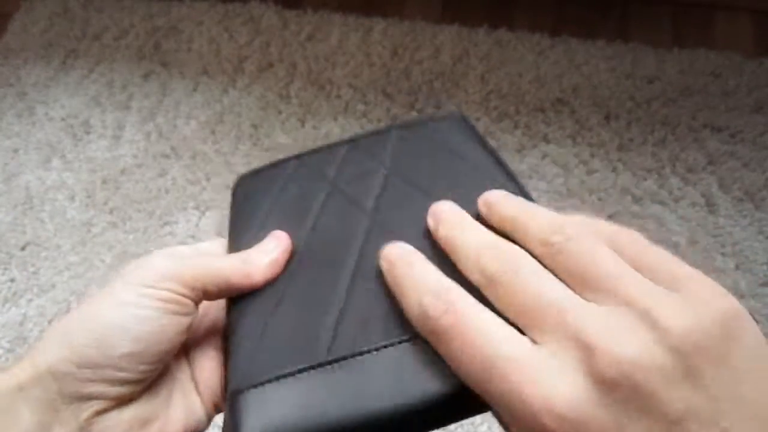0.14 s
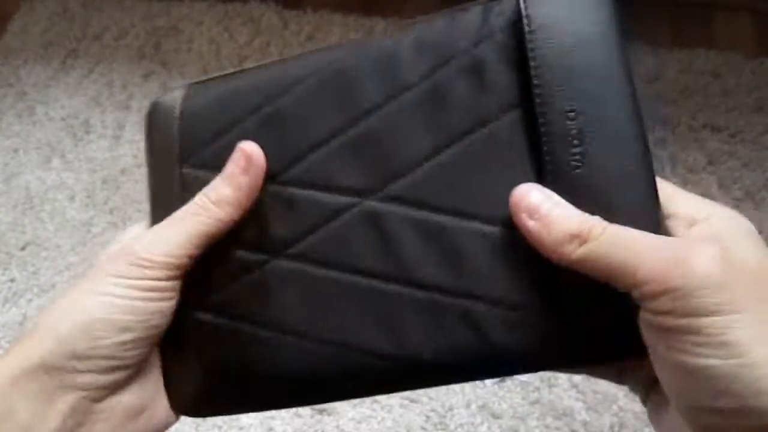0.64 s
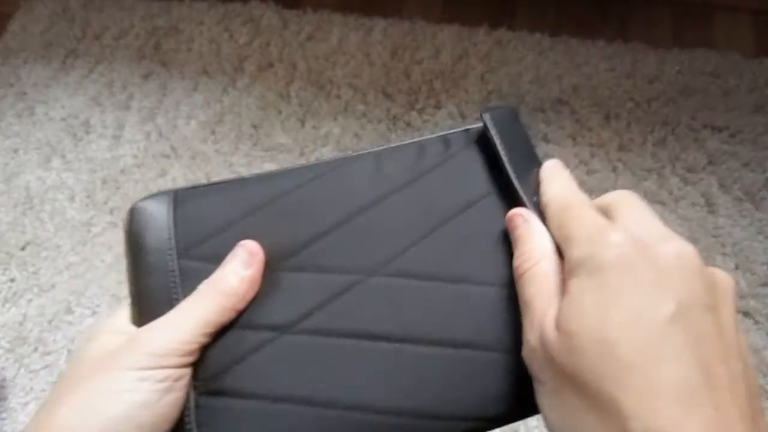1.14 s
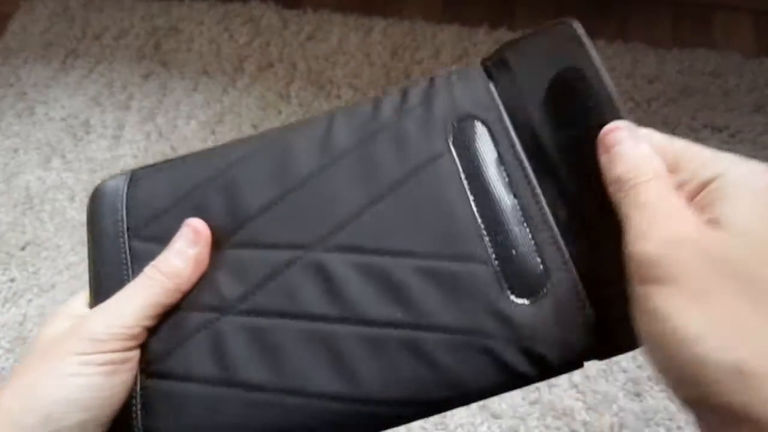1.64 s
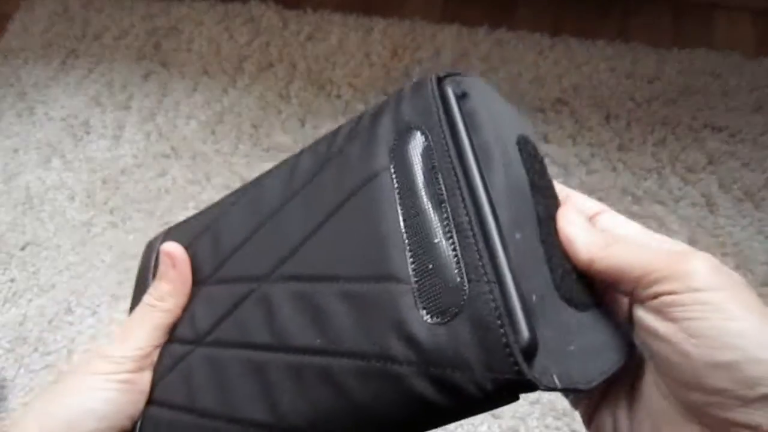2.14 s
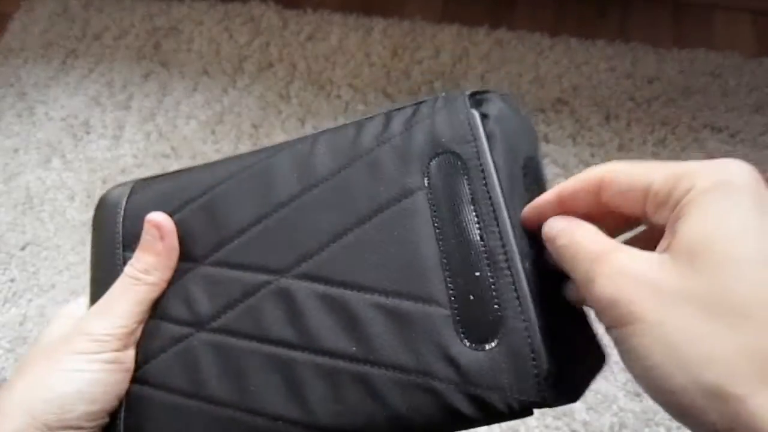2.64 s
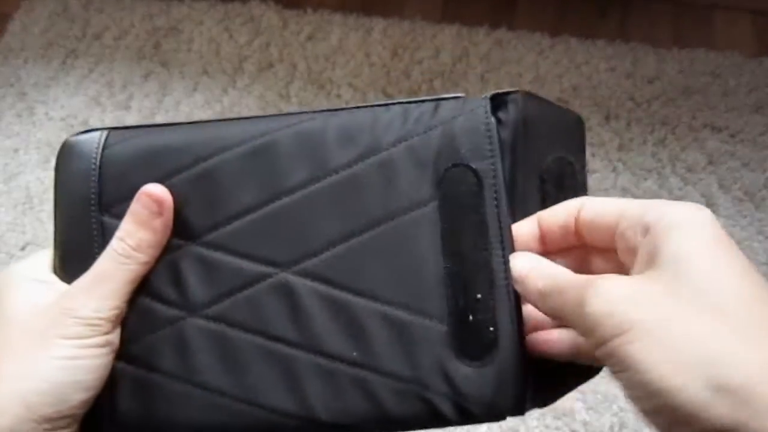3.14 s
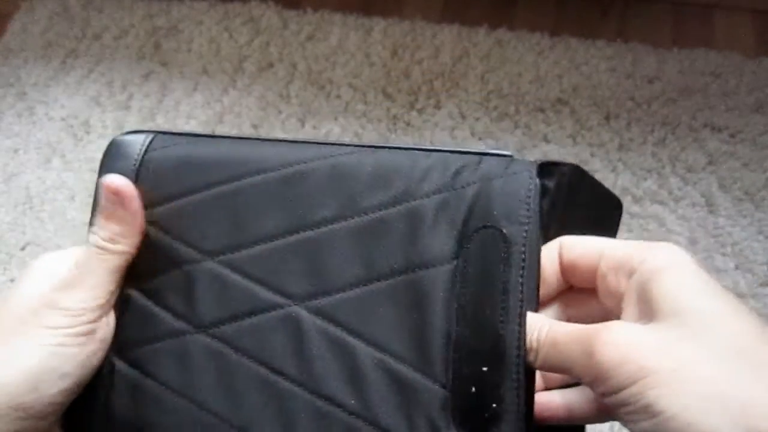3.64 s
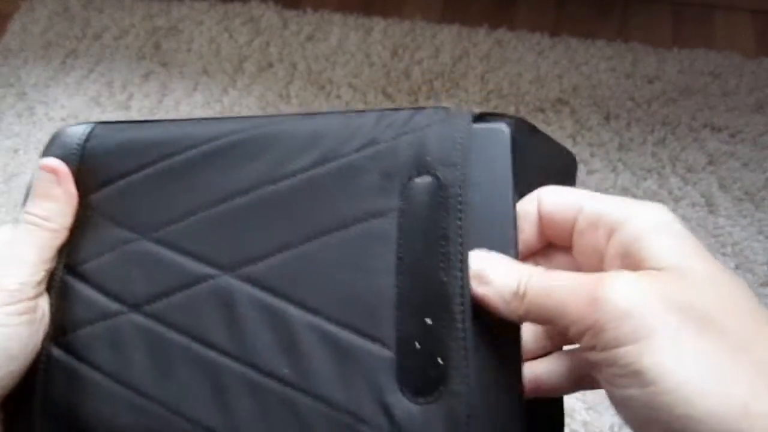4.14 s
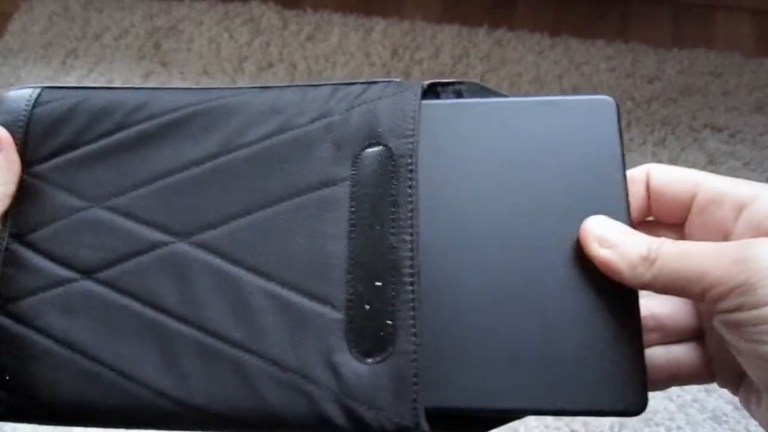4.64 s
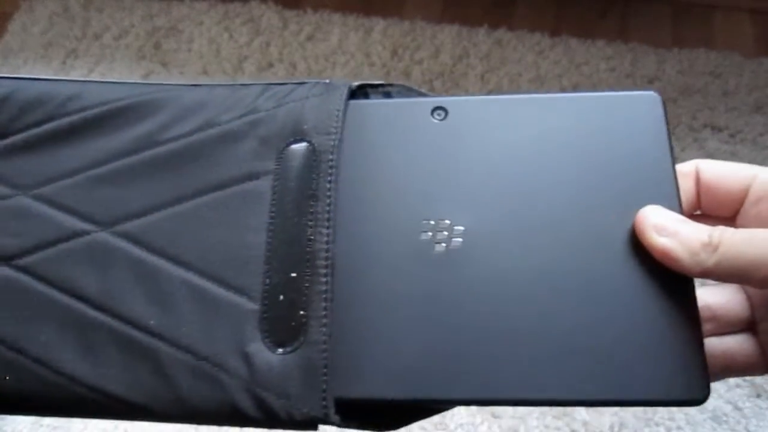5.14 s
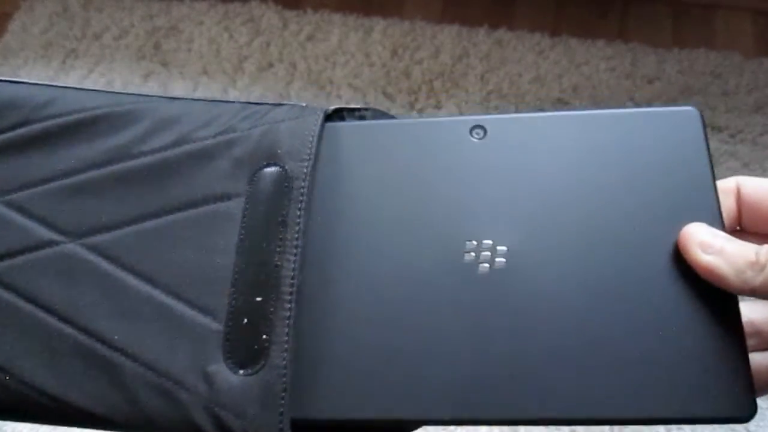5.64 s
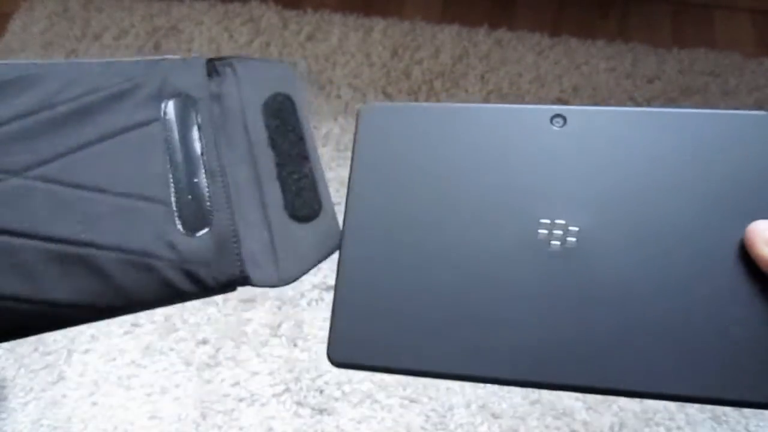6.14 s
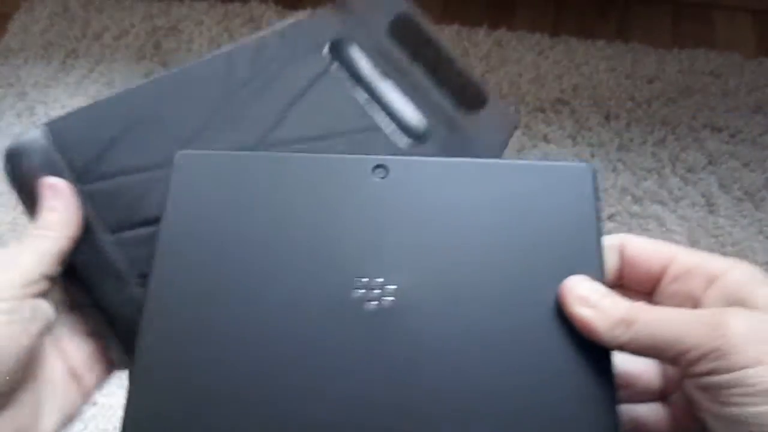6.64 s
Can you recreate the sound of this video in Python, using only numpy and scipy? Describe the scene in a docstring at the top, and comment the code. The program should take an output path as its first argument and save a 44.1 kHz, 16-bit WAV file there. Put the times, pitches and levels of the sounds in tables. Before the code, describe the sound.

A close mono microphone picks up a quiet carpeted room with a low, soft, bass-heavy tone. From 0 s fingers brush padded fabric, with a light tap near 0.06 s and a fuller cloth stroke around 0.25 s. Between 0.74 and 0.87 s a few hook-and-loop hooks pop sharply. From 1.0 s they snap one after another, thickening into a bright tearing crackle, densest around 1.25-1.48 s, then stopping abruptly with a short room tail. From 1.7 to 2.8 s only faint rubs and tiny ticks remain. Around 3-3.4 s soft rustles and small clicks return, with a crisper click near 3.9 s. From 4.1 to 5.6 s a tablet slides out with light, airy hissing strokes. A dull low knock lands at 5.78 s, another tap at 6.39 s, then little ticks and soft handling until 6.8 s.

```python
"""Fingers brush and tick on a padded fabric sleeve as hands turn it over a carpet, over a low room tone.
The hook-and-loop flap rips open: hooks let go one by one, then in a dense tearing crackle; a tablet slides out.
Ticks and single hooks ring the decaying modes of the sleeve, the tear rings clumps of random snaps, and
rubbing is grainy noise in a dull and a bright band. The floor adds a quick echo, the room a short tail."""
import sys
import numpy as np
from scipy import signal
from scipy.fft import rfft, irfft
from scipy.io import wavfile

SR = 44100
rng = np.random.default_rng(int(sys.argv[2]) if len(sys.argv) > 2 else 0)


def magnitude_from_level(level_db):
    """Linear magnitude for a level in decibels (20 dB per decade)."""
    exponent = np.asarray(level_db, float) / 20
    return 10 ** exponent


def output_pcm(signal):
    """Save a mono or channel-first signal as 16-bit PCM at the path in sys.argv[1].

    Samples are clipped to [-1, 1] before scaling.
    """
    pcm = np.clip(np.atleast_2d(signal).T, -1, 1) * 32767
    wavfile.write(sys.argv[1], SR, np.round(pcm).astype(np.int16))


N = 298557  # samples in the scene

# room tone, sinking under the rip and climbing back: start_s, level_db
ROOM_TONE_LEVEL = [(0, -54), (.75, -57), (1.0, -57), (1.5, -62), (1.8, -63.5), (2.4, -59), (3.2, -56),
                   (4.8, -54), (6.2, -56.5), (6.77, -55.5)]
# spectrum of the room tone, heavy in the bass: frequency_hz, density_db (power per Hz)
ROOM_TONE_COLOUR = [(20, 4), (50, 4), (150, 4), (440, -2.5), (1000, -8.5), (4000, -18), (16000, -25.5)]
# hands shifting their grip on the cloth, nearly still while the flap tears: start_s, level_db
GRIP_LEVEL = [(0, -59), (.44, -65), (.52, -59), (.57, -66), (.7, -55), (1.0, -60), (1.02, -78), (1.66, -80),
              (1.72, -68), (2.14, -72), (2.45, -74), (2.66, -63), (2.9, -70), (3.45, -59), (3.76, -63),
              (4.04, -56), (4.49, -59), (4.53, -68), (4.62, -66), (4.9, -59), (5.3, -64), (5.8, -64),
              (5.9, -69), (6.33, -73), (6.45, -59), (6.77, -61)]
# strokes of fingers and tablet over the weave:
# start_s, hold_s, level_db, brightness_db (bright part against dull), fade_s (time to fall 20 dB)
WEAVE_STROKES = [(.01, .07, -51, -1.2, .22), (.24, .02, -43.5, 0.1, .085), (.595, .03, -55, 5.5, .13),
                 (.71, .06, -51, -6, .17), (.87, .12, -64, 5, .05), (1.698, .01, -66, 1.2, .4),
                 (1.865, .02, -60, 3.5, .15), (2.04, .04, -64, -8, .08), (2.265, .07, -63, -4, .21),
                 (2.53, .02, -63, 2.2, .06), (2.56, .01, -56, -1.2, .06), (2.76, .02, -61, -3, .12),
                 (2.935, .06, -57, -5, .11), (2.975, .05, -53, -3, .21), (3.12, .02, -54, -9, .21),
                 (3.283, .1, -51.5, -5, .08), (3.54, .13, -58, 0.1, .1), (4.075, .05, -62, 4, .11),
                 (4.12, .27, -56, 6.8, .2), (4.43, .075, -59, 5, .04), (4.64, .2, -58, 4, .08),
                 (4.92, .31, -61, 6, .4), (5.33, .14, -63, 5, .15), (5.49, .11, -61, 4.5, .15),
                 (5.555, .004, -54, -9, .08), (5.69, .07, -63, 5, .05), (5.781, .004, -52, -4, .05),
                 (6.395, .004, -60, 2.2, .15), (6.74, .05, -57, 2.2, .11)]
# modes of the sleeve, from the padding up to the fizz of the fibres: pitch_hz, t60_s
SLEEVE_MODES = [(165, .04), (310, .022), (640, .012), (1130, .0065), (1800, .0045), (3000, .002),
                (4700, .0013), (7000, .0008), (10500, .0005)]
# fingers, seams and the tablet edge ticking:
# start_s, level_db, hardness_steps (0 pad, 1 flap, 2 crack, 3 fizz), narrowness_db_per_step
CONTACT_TICKS = [(0.0624, -23, 0.9, 5.0), (0.676, -33, 0.8, 4.0), (0.6845, -33, 1.6, 5.0),
                 (1.478, -21, 0.7, 6.0), (1.485, -33, -0.5, 4.0), (1.691, -38, 2.3, 12.0),
                 (1.8905, -41, 1.6, 5.0), (1.7068, -44, 0.2, 6.0), (2.014, -40, 0.1, 6.0),
                 (2.077, -40, 0.2, 6.0), (2.0988, -42, 1.4, 6.0), (2.2285, -42, 1.7, 6.0),
                 (2.2304, -35, 1.8, 5.0), (2.2615, -33, 1.0, 3.0), (2.322, -35, 0.4, 2.0),
                 (2.3252, -40, 0.8, 2.0), (2.5644, -37, 1.7, 7.0), (3.008, -34, 0.75, 14.0),
                 (3.237, -31, 3.2, 14.0), (3.3168, -31, 1.9, 8.0), (3.3314, -29, 0.75, 12.0),
                 (3.336, -38, -0.3, 12.0), (3.375, -34, -0.2, 6.0), (3.5818, -41, 2.5, 4.0),
                 (3.6407, -36, 1.2, 5.0), (3.8673, -32, 2.2, 9.0), (3.8835, -25, 2.9, 7.0),
                 (3.9238, -33, 1.2, 5.0), (4.6359, -39, 2.0, 8.0), (4.848, -42, 0.1, 3.0),
                 (4.9, -38, -0.3, 9.0), (5.363, -36, 0.8, 4.0), (5.5495, -40, -0.1, 2.0),
                 (5.558, -31, 0.25, 5.0), (5.7703, -37, 1.9, 5.0), (5.7764, -19.5, 0.0, 16.0),
                 (5.786, -38, 1.3, 16.0), (6.3888, -22.5, 0.75, 7.0), (6.3988, -35, 1.7, 7.0),
                 (6.428, -41, 1.7, 4.0), (6.468, -40, 1.5, 4.0), (6.482, -36, 1.6, 3.0),
                 (6.505, -38, 1.6, 3.0), (6.5258, -37, 0.6, 3.0), (6.727, -39, -0.1, 9.0),
                 (6.755, -35, -0.1, 7.0)]
# the loudest hooks letting go: start_s, thud_level_db (flap), crack_level_db (fibres)
LOUD_HOOKS = [(0.742, -42, -24), (0.7567, -27.7, -24), (0.7611, -19, -7), (0.7668, -15, -4),
              (0.7956, -48, -22), (0.8636, -21, -10), (1.014, -15.5, -13.5), (1.036, -17.5, -19),
              (1.0578, -21, -10.5), (1.069, -18.5, -10), (1.0771, -24, -14), (1.0802, -22, -17),
              (1.0918, -25, -18.7), (1.102, -28, -13), (1.127, -30, -16.5), (1.1404, -42, -13),
              (1.1455, -41, -21), (1.149, -30, -13), (1.152, -41, -20), (1.1676, -24.5, -9),
              (1.1791, -34, -5.5), (1.1818, -33, -18), (1.1848, -27, -18), (1.2038, -23, -12),
              (1.2064, -25, -12), (1.2094, -21, -14), (1.2269, -17, -8), (1.2296, -20, -13),
              (1.2309, -16, -9), (1.2331, -26, -14), (1.2352, -28, -15), (1.245, -36.7, -17),
              (1.2503, -29, -15), (1.257, -20, -14), (1.263, -28, -13), (1.2705, -36, -12),
              (1.2916, -36, -11), (1.3035, -38, -16.5), (1.312, -40, -14), (1.3263, -30, -16),
              (1.3349, -34, -11), (1.3905, -29, -12)]
# a hook's thud shared among the five low modes: level_db
HOOK_THUD_SHARE = [-28, -12, -8, 1.5, 0.1]
# a hook's crack shared among the four high modes: level_db
HOOK_CRACK_SHARE = [-1.5, 0, -3, -12]
# tugs on the flap, each freeing a clump of hooks: start_s, hold_s, level_db, centre_hz
FLAP_TUGS = [(1.014, .002, -39, 2100), (1.058, .002, -40, 1600), (1.076, .024, -37, 3200),
             (1.144, .006, -35, 4400), (1.180, .004, -31, 3600), (1.205, .005, -34, 4500),
             (1.230, .004, -26, 3600), (1.258, .008, -23.5, 4300), (1.293, .010, -28, 6500),
             (1.3415, .012, -22, 5000), (1.360, .009, -17.5, 5800), (1.380, .008, -21.5, 5000),
             (1.391, .002, -23, 5000), (1.401, .005, -21, 4500), (1.414, .015, -24, 4200),
             (1.435, .004, -26, 4200), (1.446, .003, -31, 3600), (1.456, .003, -32, 3600),
             (1.465, .021, -20.5, 3900)]
# how strongly the tearing shakes the five low modes: level_db
TEAR_BODY = [-12, -14, -23, -13, -18]

GRIP_BRIGHT_DB, STROKE_RISE_DB_PER_S = -5, 550
TUG_RISE_DB_PER_S, TUG_FALL_DB_PER_S, SLACK_DB = 2600, 900, -50
RIP_START_S, RIP_END_S = 1.012, 1.495
FLOOR_ECHO_S, FLOOR_ECHO_DB = 0.003, -17
ROOM_T60_S, TREBLE_T60_S, ROOM_DB, WALL_CUT_HZ = 0.43, 0.33, -14, 7000


def rms_one(x):
    """Scale to unit rms."""
    return x / np.sqrt(np.mean(x ** 2) + 1e-20)


def in_time(rows):
    """Join the points of each column by straight lines, one value a sample."""
    s, *columns = np.transpose(rows)
    return [np.interp(np.arange(N) / SR, s, column) for column in columns]


def band(x, low_hz, high_hz):
    """Butterworth band-pass."""
    return signal.sosfilt(signal.butter(2, [low_hz, high_hz], "band", fs=SR, output="sos"), x)


def thin(x, hz, order):
    """High-pass: a small patch of cloth radiates little bass."""
    return signal.sosfilt(signal.butter(order, hz, "high", fs=SR, output="sos"), x)


def drift(rate_hz):
    """Slow random wander of unit rms: noise through a double one-pole low-pass."""
    r = np.exp(-2 * np.pi * rate_hz / SR)
    noise = rng.standard_normal(N + SR)
    settled = signal.lfilter([1], [1, -2 * r, r * r], noise)[SR:]
    return rms_one(settled)


def swell_db(start_s, hold_s, rise, fall):
    """Attack, hold at 0 dB and release of one event; slopes in dB a second."""
    t = np.arange(N) / SR
    return -rise * np.maximum(start_s - t, 0) - fall * np.maximum(t - start_s - hold_s, 0)


def ring(clicks, hz, t60_s):
    """Resonator: a unit click sets off a decaying sine that starts from height 1."""
    r, w = magnitude_from_level(-60 / (t60_s * SR)), 2 * np.pi * hz / SR
    return signal.lfilter([0, np.sin(w)], [1, -2 * r * np.cos(w), r * r], clicks + 1e-18)


def strike(times_s, levels_db, detune, sharpness):
    """Each contact rings all sleeve modes, a little off pitch and strength every time."""
    length = 2048
    out, t = np.zeros(N + length), np.arange(length) / SR
    hz, t60_s = np.transpose(SLEEVE_MODES)[:, :, None]
    soft_start = 1 - np.exp(-sharpness * hz * t)  # cloth gives way over a fraction of a cycle
    chance = rng.standard_normal((len(times_s), 2, len(SLEEVE_MODES), 1))
    for s, db, (off_pitch, off_level) in zip(times_s, levels_db, chance):
        strength = magnitude_from_level(db[:, None] + 1.5 * off_level - 60 * t / t60_s)
        pitch_hz = hz * np.exp(detune * off_pitch)
        rings = strength * soft_start * np.sin(2 * np.pi * pitch_hz * t)
        speed = np.gradient(rings, axis=1) * SR / (2 * np.pi * hz)  # the air follows the speed of the cloth
        at = round(s * SR)
        out[at:at + length] -= speed.sum(axis=0)
    return out[:N]


def room_tone():
    """Noise shaped to be heavy in the bass, its level wavering a little."""
    hz = np.maximum(np.arange(N // 2 + 1) * SR / N, 10)
    colour_hz, density_db = np.transpose(ROOM_TONE_COLOUR)
    colour_db = np.interp(np.log(hz), np.log(colour_hz), density_db)
    noise = irfft(rfft(rng.standard_normal(N)) * magnitude_from_level(colour_db), N)
    level_db = in_time(ROOM_TONE_LEVEL)[0] + 1.36 * drift(2.1)
    return rms_one(noise) * magnitude_from_level(level_db)


def contact():
    """Gains of the dull and the bright rubbing: grip and strokes add in power."""
    dull = magnitude_from_level(2 * in_time(GRIP_LEVEL)[0])
    bright = dull * magnitude_from_level(2 * GRIP_BRIGHT_DB)
    for s, hold_s, db, bright_db, fade_s in WEAVE_STROKES:
        power = magnitude_from_level(2 * (db + swell_db(s, hold_s, STROKE_RISE_DB_PER_S, 20 / fade_s)))
        dull = dull + power
        bright = bright + power * magnitude_from_level(2 * bright_db)
    return np.sqrt(dull), np.sqrt(bright)


def rubbing():
    """Skin and tablet drag over the weave: fine fibre grains on hiss, in a dull and a bright part."""
    dull_gain, bright_gain = contact()
    sizes = magnitude_from_level(3.4 * np.minimum(rng.exponential(1, N), 4)) * rng.choice([-1, 1], N)
    caught = rng.random(N) < 3000 * magnitude_from_level(2.5 * drift(40)) / SR  # around 3000 grains a second
    grains = rms_one(sizes * caught)
    drag = (rng.standard_normal((2, N)) + .7 * grains) * magnitude_from_level(.7 * drift(25))
    hiss = magnitude_from_level(-.8) * rms_one(band(drag[0], 467, 3550))
    creases = magnitude_from_level(-11.5) * rms_one(band(drag[1], 157, 840)) * magnitude_from_level(3.1 * drift(45))
    flap = magnitude_from_level(-7) * rms_one(ring(drag[0], *SLEEVE_MODES[3])) * magnitude_from_level(3.5 * drift(35))
    dull = hiss + creases + flap
    softened = signal.lfilter([1], [1, -.25], drag[1]) * magnitude_from_level(.4 * drift(22))
    bright = rms_one(band(softened, 3500, 13800))
    return dull_gain * dull + bright_gain * bright


def ticks():
    """Small contacts on the sleeve; a harder one rings higher modes, and those below it fall off faster."""
    s, db, hardness, narrowness = np.transpose(CONTACT_TICKS)[:, :, None]
    above = np.arange(len(SLEEVE_MODES)) / 2 - .75 - hardness  # modes lie half a hardness step apart
    levels_db = db - narrowness * np.maximum(above, -2 * above)
    return thin(strike(s[:, 0], levels_db, detune=.06, sharpness=4.5), hz=110, order=2)


def hooks():
    """Single hooks let go: a thud in the flap's low modes and a crack in the high modes of the fibres."""
    s, thud_db, crack_db = np.transpose(LOUD_HOOKS)
    thuds_db = thud_db[:, None] + HOOK_THUD_SHARE
    cracks_db = crack_db[:, None] + HOOK_CRACK_SHARE
    struck = strike(s, np.hstack([thuds_db, cracks_db]), detune=.11, sharpness=8)
    return -thin(struck, hz=620, order=2)


def pull():
    """Level and centre of the tearing: the strongest tug leads, the centre glides from tug to tug."""
    level_db = np.full(N, float(SLACK_DB))
    for s, hold_s, db, _ in FLAP_TUGS:
        level_db = np.maximum(level_db, db + swell_db(s, hold_s, TUG_RISE_DB_PER_S, TUG_FALL_DB_PER_S))
    centre_hz = in_time([(s, hz) for s, _, _, hz in FLAP_TUGS])[0]
    return level_db, centre_hz


def tearing():
    """Many small hooks give way in clumps; a harder pull frees more of them each second."""
    level_db, centre_hz = pull()
    t = np.arange(N) / SR
    pulled = (t > RIP_START_S) & (t < RIP_END_S)
    per_s = np.clip(1900 * magnitude_from_level(.5 * (level_db + 24)), 200, 2800)
    born = rng.random(N) < per_s * magnitude_from_level(3 * drift(300)) / SR  # the wander bunches the snaps
    sizes = magnitude_from_level(3.5 * np.minimum(rng.exponential(1, N), 2.6)) * rng.choice([-1, 1], N)
    snaps = sizes * born * pulled / np.sqrt(per_s)  # offsets the power of denser snaps

    pitches_hz = np.geomspace(1100, 12000, 14)
    dealt = rng.integers(0, len(pitches_hz), N)  # each snap rings one pitch
    crackle = 0
    for k, hz in enumerate(pitches_hz):
        share = magnitude_from_level(-9.0 * np.log2(hz / centre_hz) ** 2)  # snaps gather round the centre
        share = share * (hz / centre_hz) ** .3
        crackle = crackle + ring(snaps * share * (dealt == k), hz, 6.0 / hz)
    crackle = band(thin(crackle, hz=740, order=4), 650, 17500)
    crackle = magnitude_from_level(level_db) * crackle / np.std(crackle[pulled])

    body = 0
    for db, (hz, t60_s) in zip(TEAR_BODY, SLEEVE_MODES[:5]):
        mode = ring(snaps * rng.standard_normal(N), hz, t60_s)
        body = body + magnitude_from_level(db) * mode / np.std(mode[pulled])
    return crackle + thin(magnitude_from_level(level_db) * body, hz=600, order=3)


def room(x):
    """A smeared echo off the carpet, then a dense tail of dying noise that loses its treble first."""
    t = np.arange(SR // 2) / SR
    echo = band(rng.standard_normal(len(t)), 700, 13000) * magnitude_from_level(-60 * t / 0.0061)
    echo = echo / np.sqrt(np.sum(echo ** 2)) * magnitude_from_level(FLOOR_ECHO_DB)
    echo = np.roll(echo, round(FLOOR_ECHO_S * SR))
    noise = rng.standard_normal((2, len(t)))
    low = band(noise[0], 230, WALL_CUT_HZ) * magnitude_from_level(-60 * t / ROOM_T60_S)
    high = band(noise[1], WALL_CUT_HZ, 15000) * magnitude_from_level(-60 * t / TREBLE_T60_S)
    fade_in = np.clip(t / 0.0076, 0, 1)
    tail = signal.lfilter([1, -.15], [1], low + high) * fade_in
    tail = tail / np.sqrt(np.sum(tail ** 2)) * magnitude_from_level(ROOM_DB)
    return signal.fftconvolve(x, echo + tail)[:N]


def scene():
    """Ticks, hooks and tearing sound in the room; rubbing and room tone join them dry."""
    contacts = ticks() + hooks() + tearing()
    mix = room_tone() + rubbing() + contacts + room(contacts)
    return mix[None]  # one channel


def top_cut(x):
    """Nothing passes above the cut-off."""
    return signal.sosfilt(signal.butter(12, 16640, fs=SR, output="sos"), x)


def record(dry):
    """Peaks are rounded off and the treble above 15.6 kHz is cut steeply."""
    rounded = np.tanh(dry)
    treble_cut = signal.ellip(10, .1, 30, 15600, fs=SR, output="sos")
    finished = signal.sosfilt(treble_cut, rounded)
    return top_cut(finished)


dry = scene()
out = record(dry)
output_pcm(out)
```